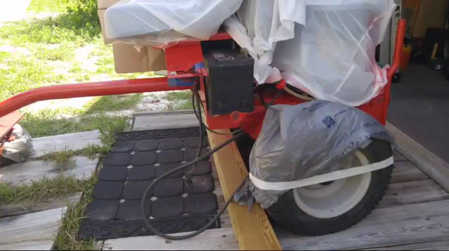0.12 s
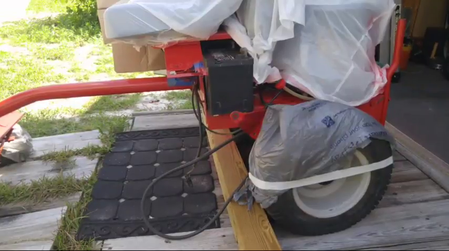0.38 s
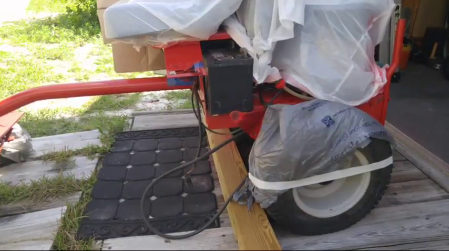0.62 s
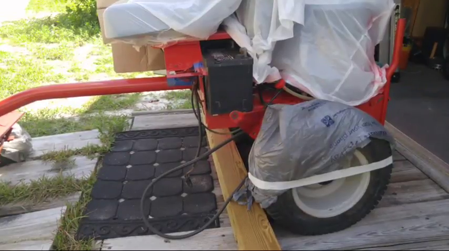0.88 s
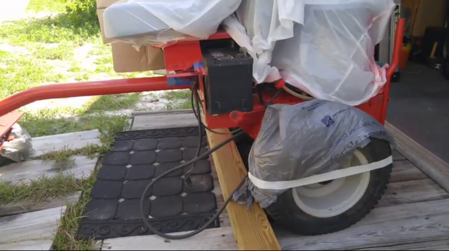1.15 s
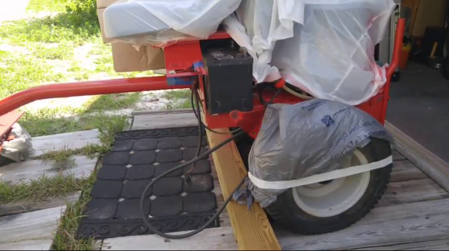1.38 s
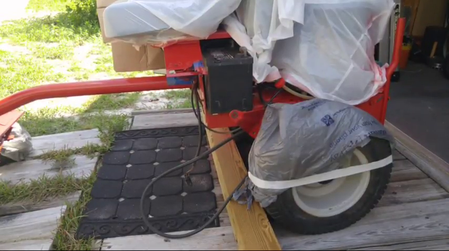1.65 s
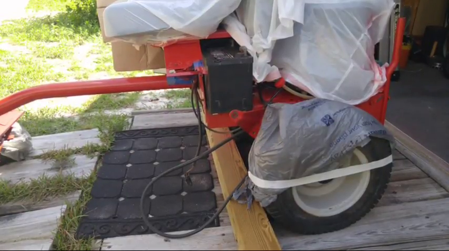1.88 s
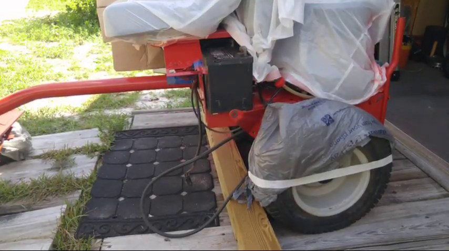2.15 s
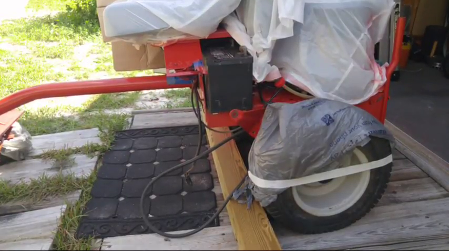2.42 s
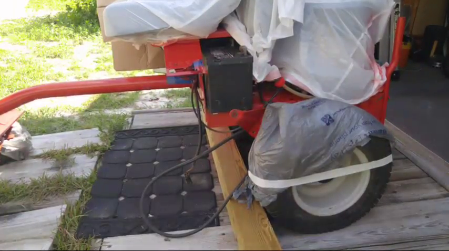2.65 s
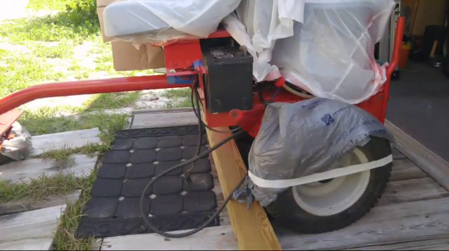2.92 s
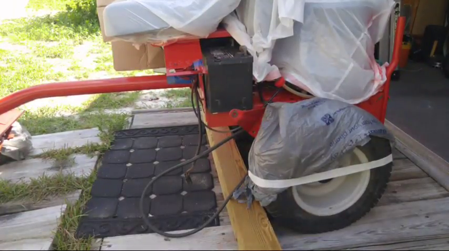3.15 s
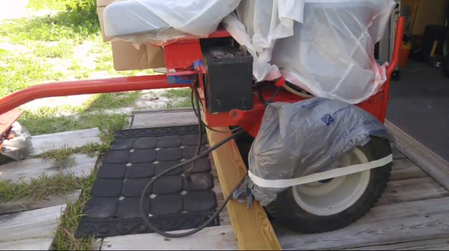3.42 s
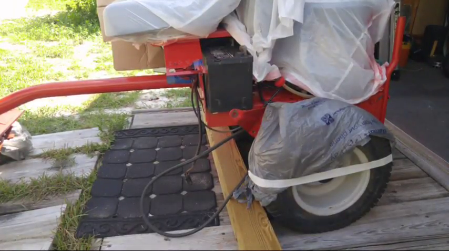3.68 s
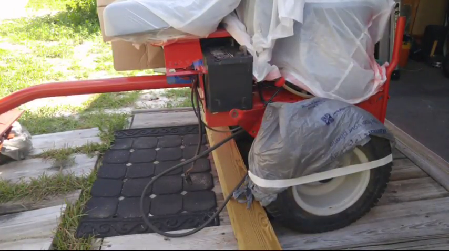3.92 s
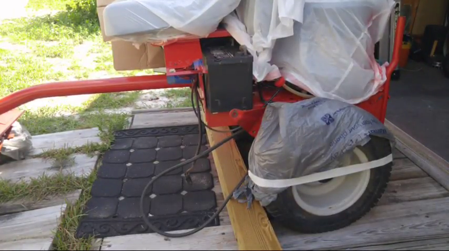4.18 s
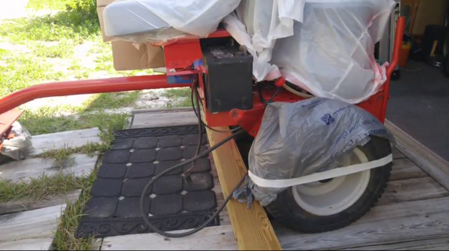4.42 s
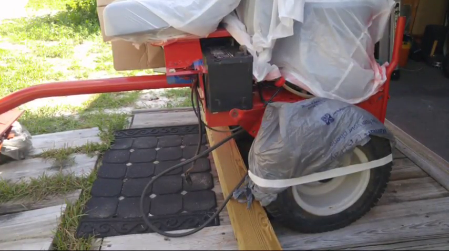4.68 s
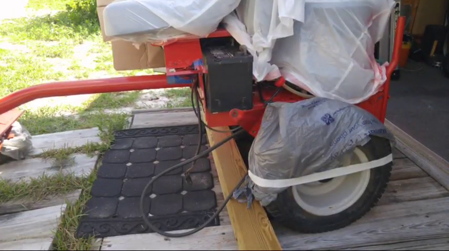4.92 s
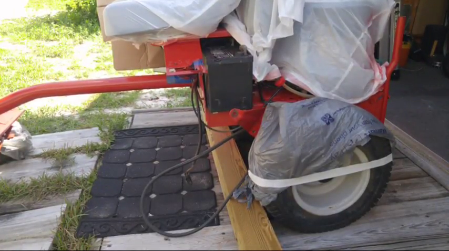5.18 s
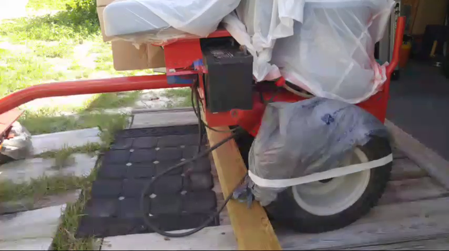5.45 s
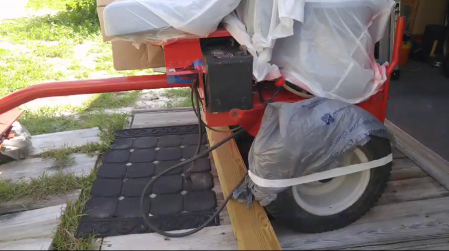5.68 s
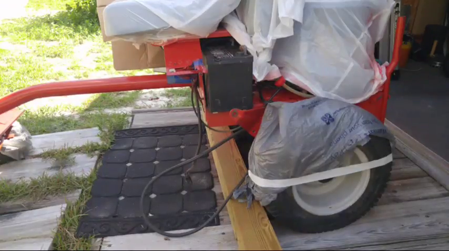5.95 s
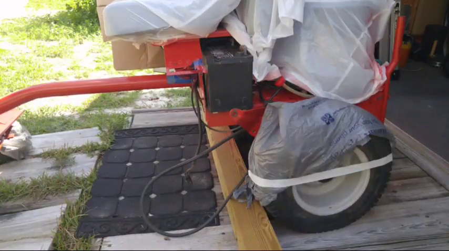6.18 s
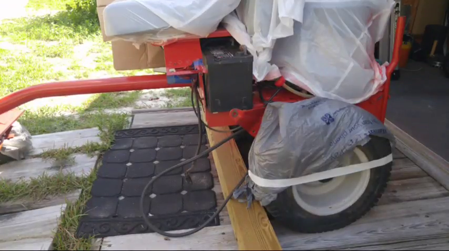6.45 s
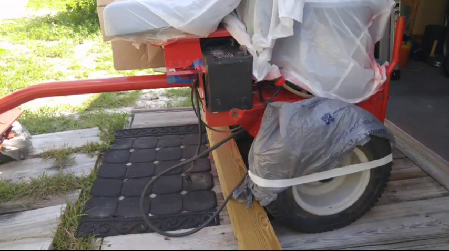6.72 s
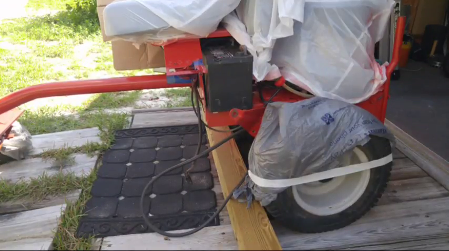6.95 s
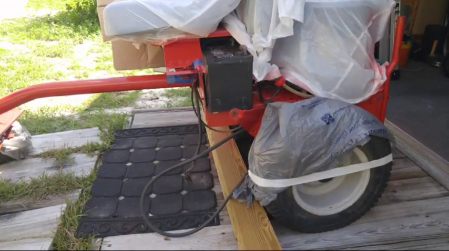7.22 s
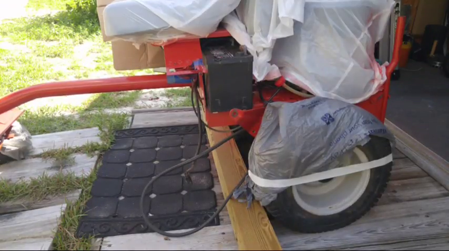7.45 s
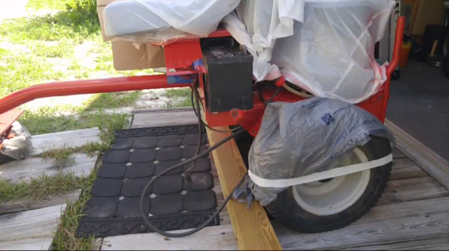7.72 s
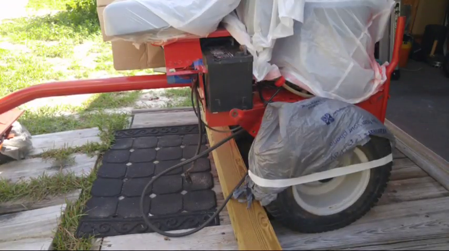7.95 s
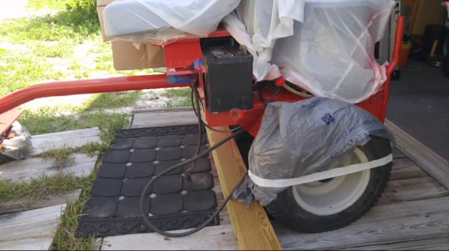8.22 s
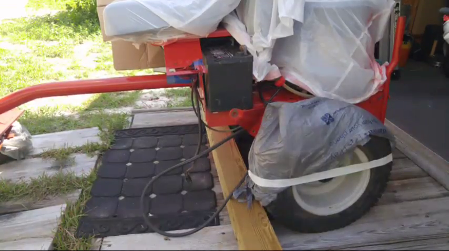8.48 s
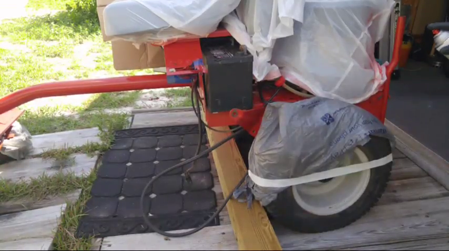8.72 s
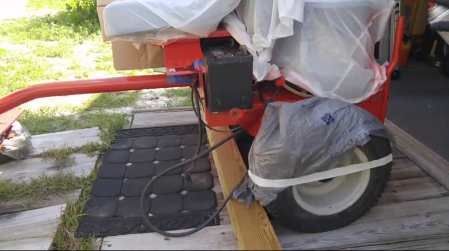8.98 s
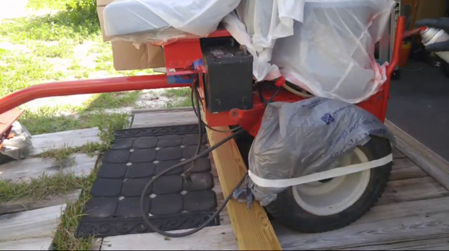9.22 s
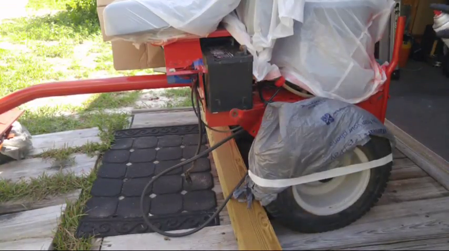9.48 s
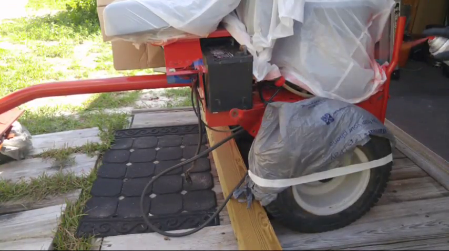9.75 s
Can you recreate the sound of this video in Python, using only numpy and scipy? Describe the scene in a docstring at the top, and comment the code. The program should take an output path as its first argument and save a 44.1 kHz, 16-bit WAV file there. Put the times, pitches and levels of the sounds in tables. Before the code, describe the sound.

Close outdoor pickup with little echo: soft air, faint wavering hum and swelling low rumble. After light dry rustling, a steel paint can is shaken, the ball knocking, bouncing and scraping round the wall, damped by liquid paint. The loudest rattling comes early, then weaker clusters. High thin bird whistles are heard three times. Finally two quick hissing spurts and a small clink.

```python
"""Shaking a spray paint can

A spray paint can is shaken in a quiet yard by an open shed: the ball knocks, bounces and rolls on the
steel wall, damped by the paint. Knocks ring decaying sines with noise cracks; rolling is noise through modes.
Two short test sprays of shaped, fluttering noise hiss near the end. A small bird whistles three times in
gliding sines, banded noise and snaps rustle close by. A hum of wavering sines lies under all, with low
rumble, two bands of noise that swell, the upper one with the shaking."""
import sys
import numpy as np
from scipy import signal
from scipy.fft import rfft, irfft
from scipy.io import wavfile

SR = 44100
rng = np.random.default_rng(int(sys.argv[2]) if len(sys.argv) > 2 else 0)


def wav_record(signal):
    """Record a signal, one row per channel, as 16-bit PCM in the file named by sys.argv[1]."""
    frames = np.transpose(np.atleast_2d(signal))
    bounded = np.clip(frames, -1, 1)
    # unit amplitude maps onto the largest positive 16-bit level
    quanta = np.round(bounded * 32767).astype(np.int16)
    wavfile.write(sys.argv[1], SR, quanta)


def amplitude_ratio(level_db):
    """Convert a level in decibels to the matching linear amplitude (field) ratio."""
    exponent = np.asarray(level_db, float) / 20
    return 10 ** exponent


N = 434826


def rms_one(x):
    """Scale to rms 1."""
    return x / np.sqrt(np.mean(x ** 2) + 1e-20)


def in_time(rows):
    """Columns of a curve at every sample; the last (a dB) falls silent outside the curve."""
    s, *columns = np.transpose(rows)
    t = np.arange(N) / SR
    out = [np.interp(t, s, c) for c in columns]
    out[-1][(t < s[0]) | (t > s[-1])] = -140
    return out


def drift(rate_hz):
    """Slow random wander with rms 1: noise through two equal low-pass poles at rate_hz."""
    r = np.exp(-80 * np.pi * rate_hz / SR)  # runs at one point per 40 samples
    noise = rng.standard_normal(N // 40 + 2002)
    slow = signal.lfilter([1], [1, -2 * r, r * r], noise)[2000:]  # skip the filter's start
    return np.interp(np.arange(N) / 40, np.arange(len(slow)), rms_one(slow))


def band(x, low_hz, high_hz):
    """Band-pass."""
    return signal.sosfilt(signal.butter(2, [low_hz, high_hz], "band", fs=SR, output="sos"), x)


def band_noise(low_hz, high_hz):
    """Steady band of noise, rms 1."""
    return rms_one(band(rng.standard_normal(N), low_hz, high_hz))


def coloured(spectrum):
    """Steady noise with the given spectrum, rms 1."""
    hz, db = np.transpose(spectrum)
    grid_hz = np.arange(1, N // 2 + 2) * SR / N
    gain = amplitude_ratio(np.interp(np.log(grid_hz), np.log(hz), db))
    return rms_one(irfft(rfft(rng.standard_normal(N)) * gain, N))


def ring(clicks, hz, t60):
    """A unit click sets a sine of height 1 ringing, down 60 dB in t60 seconds."""
    r, w = amplitude_ratio(-60 / (t60 * SR)), 2 * np.pi * hz / SR
    return signal.lfilter([0, np.sin(w)], [1, -2 * r * np.cos(w), r * r], clicks + 1e-18)


def dying(clicks, t60):
    """Envelope that jumps at each click and dies away by 60 dB in t60 seconds."""
    return signal.lfilter([1], [1, -amplitude_ratio(-60 / (t60 * SR))], clicks + 1e-18)


def train(s, sizes):
    """Clicks of the given sizes at the given times."""
    out = np.zeros(N)
    np.add.at(out, np.round(np.asarray(s) * SR).astype(int), sizes)
    return out


def held(start, length, rise, fall):
    """Gain in dB: up 60 dB in rise seconds, -30 dB at start, hold, down 60 dB in fall seconds."""
    t = np.arange(N) / SR - start
    return np.clip(60 * np.minimum(t / rise - .5, (length - t) / fall), -200, 0)


# colour of the yard air: f/Hz, relative level/dB per Hz
YARD_AIR = [(25, -12.5), (42, -13.5), (58, -8), (146, -10), (200, -2), (290, -8.5), (330, -11.5),
            (600, -14.5), (1090, -20), (1830, -25), (3000, -30.5), (4000, -29), (5000, -32), (6100, -27.5),
            (7200, -33.5), (8600, -29.5), (11300, -44.5), (17500, -45)]
# low rumble that swells and sinks, its upper part with the shaking: t/s, deep level/dB, upper level/dB
RUMBLE_SWELLS = [(0.0, -88, -85), (0.7, -95, -81), (1.9, -90, -81), (2.28, -70, -65), (2.6, -91, -78.5),
                 (3.2, -84, -74.5), (3.6, -81, -63), (4.0, -70.5, -63), (4.25, -82, -69.5), (4.7, -78, -74),
                 (5.0, -69, -73.5), (5.35, -76, -78), (5.8, -83, -76), (6.2, -75, -72.5), (6.5, -83, -80),
                 (7.35, -90, -80), (7.7, -75, -84.5), (8.35, -81.5, -74), (9.0, -71, -75), (9.86, -82, -74)]
# hum lines, before their waver: f/Hz, rms level/dB
HUM_LINES = [(119, -79.5), (290, -78.5), (587, -85), (684, -89.5), (1055, -89), (1114, -92.5)]


def yard():
    """Steady shaped noise for air, two swelling noise bands for rumble and wavering sines for hum."""
    t = np.arange(N) / SR
    hum = 0
    for hz, db in HUM_LINES:
        line = np.sin(2 * np.pi * (hz * t + .15 * drift(2.2)))
        hum = hum + np.sqrt(2) * amplitude_ratio(db + 1.7 * drift(3)) * line
    deep_db, upper_db = in_time(RUMBLE_SWELLS)
    deep = band_noise(58, 82) * amplitude_ratio(deep_db)
    upper = band_noise(110, 290) * amplitude_ratio(upper_db)
    return amplitude_ratio(-69.5) * coloured(YARD_AIR) + deep + upper + hum


# swells of the rustle's hiss, before its flutter: t/s, level/dB
RUSTLE_SWELLS = [(0.4, -82), (0.5, -91), (0.536, -77), (0.636, -69.5), (0.716, -76), (0.826, -100),
                 (1.03, -80), (1.126, -89), (1.262, -80), (1.43, -83.5), (1.66, -71.5), (1.84, -82),
                 (1.998, -69), (2.03, -76), (2.7, -92), (3.05, -80), (3.28, -78)]
# dry snaps: t/s, peak level/dB, f/Hz
RUSTLE_SNAPS = [(0.702, -47, 4800), (0.701, -48, 8200), (0.9394, -65, 4020), (1.035, -53, 4400),
                (1.269, -51, 6900), (1.621, -50, 3480)]


def rustle():
    """Cloth or thin plastic close by: grainy hiss and a few dry snaps, each a very short ringing sine."""
    hiss = band_noise(3000, 9300) * amplitude_ratio(in_time(RUSTLE_SWELLS)[0] + 2.2 * drift(60))
    return hiss + sum(ring(train([s], amplitude_ratio(db)), hz, 0.0027) for s, db, hz in RUSTLE_SNAPS)


# whistles: t/s, length/s, first f/Hz, last f/Hz, drop into pitch f/Hz, level/dB before flutter
WHISTLES = [(1.065, .22, 6930, 6780, 600, -72), (2.9, .25, 6680, 6280, 60, -73),
            (6.855, .22, 7000, 6910, 550, -77)]


def bird():
    """A thin wavering whistle that drops into its gliding pitch, with a weaker fluttering partner below."""
    chirp_s, rise_s, fall_s = .025, .03, .3  # rise and fall are times for 60 dB
    out = 0
    for s, length, first_hz, last_hz, chirp_hz, db in WHISTLES:
        t = np.clip(np.arange(N) / SR - s, 0, length)
        hz = first_hz + (last_hz - first_hz) * t / length + chirp_hz * np.exp(-t / chirp_s)
        phase = 2 * np.pi * np.cumsum(hz + 25 * drift(88)) / SR
        whistle = np.sin(phase) * amplitude_ratio(3.5 * drift(30))
        partner = amplitude_ratio(-17) * np.sin(.85 * phase) * (1 + .6 * drift(40))
        out = out + np.sqrt(2) * amplitude_ratio(db + held(s, length, rise_s, fall_s)) * (whistle + partner)
    return out


# the ball rolls round the wall: t/s, length/s, wall ring level/dB, scrape level/dB
ROLLS_ROUND = [(1.95, .09, -73, -70), (2.047, 0.34, -72.5, -66.5), (2.463, 0.15, -72.5, -69),
               (3.352, 0.19, -68, -66), (3.565, 0.34, -61.5, -60), (3.932, 0.24, -67, -69.5),
               (4.183, .04, -75, -72), (4.315, 0.11, -59, -68), (4.518, .13, -69, -68),
               (4.66, .17, -70, -73), (4.842, 0.11, -84, -71.5), (4.987, 0.23, -80, -84.5),
               (5.417, 0.15, -81.5, -88), (5.75, 0.24, -76, -87), (5.96, .1, -63, -64.5),
               (6.116, 0.054, -69, -65.5), (6.191, 0.11, -63, -65), (6.308, 0.14, -69, -76),
               (6.446, 0.095, -67, -66.5), (6.565, .14, -87, -76.5), (6.726, 0.073, -66, -66.5),
               (6.821, 0.28, -79, -76.5), (7.283, .19, -73, -77.5), (7.629, .14, -72, -79),
               (7.896, .15, -78.5, -80.5), (8.1, 0.19, -86, -82), (8.31, .26, -79.5, -79.5)]
ROLL_HZ, SLOSH_HZ = 1710, 70  # middle of the wall ring's pitch, and its spread as the paint sloshes


def roll_levels():
    """Wall and scrape level of the rolling ball, dB at every sample, overlapping rolls adding up."""
    gains = 0
    for s, length, wall_db, scrape_db in ROLLS_ROUND:
        gains = gains + amplitude_ratio(held(s, length, 0.033, 0.11) + np.c_[[wall_db, scrape_db]])
    return 20 * np.log10(gains)


# modes of the can above the wall ring, lowest parts first: f/Hz, relative level/dB, nominal t60/s
CAN_MODES = [(2254, -19.5, 0.03), (2630, -12.5, .05), (2930, -17, 0.088), (3120, -11.5, 0.021),
             (3614, -10, 0.067), (3890, -5.5, 0.025), (4300, -12, .07), (4480, -10, .05),
             (4630, -16, 0.046), (5070, -18, 0.07), (5486, -12.5, 0.023), (5770, -25, .07),
             (6100, -5.5, 0.033), (6490, -6, 0.036), (6690, -14, 0.054), (7000, -15.5, .05),
             (7150, -21.5, 0.036), (7930, -12, 0.036), (8420, -11, 0.066), (8750, 1.5, 0.018),
             (8710, -5, 0.029), (9200, -3, .035), (9520, 0.5, 0.016), (10200, -8, 0.028)]
# colour of the ball's scrape: f/Hz, relative level/dB per Hz
SCRAPE_COLOUR = [(1500, -26), (2300, -4), (2800, -2.5), (4400, -0.5), (5400, -3.5), (6400, 0.5), (7400, -1),
                 (8800, 0.5), (10000, -5), (11500, -22), (15000, -30)]


def rolling(wall_db, scrape_db):
    """Dense uneven skips drive the wall ring and, as a scrape, the body and shoulder modes."""
    hz = ROLL_HZ + SLOSH_HZ * drift(4.0)
    # about 250 skips a second
    skips = (rng.random(N) < 250 / SR) * amplitude_ratio(3.0 * np.minimum(rng.exponential(1, N), 3))
    bumpy = 1.2 + rms_one(dying(skips, .03))
    # a narrow band of noise carried along the moving pitch
    r = np.exp(-np.pi * 100 / SR)
    noise = rng.standard_normal(N) + 1j * rng.standard_normal(N)
    slow = signal.lfilter([1], [1, -r], bumpy * noise)
    wall = rms_one(np.real(slow * np.exp(2j * np.pi * np.cumsum(hz) / SR)))
    rub = bumpy * coloured(SCRAPE_COLOUR)
    rings = 0
    for k, (mode_hz, db, t60) in enumerate(CAN_MODES[:17]):  # those below the rim
        rings = rings + amplitude_ratio(db) * ring(rub, mode_hz, .6 * t60) * (-1) ** k
    scrape = rms_one(0.7 * rms_one(rings) + rms_one(rub))
    return amplitude_ratio(wall_db) * wall + amplitude_ratio(scrape_db) * scrape


# ball on steel, drive into each part: t/s, wall ring f/Hz, wall ring level/dB, body level/dB, rim level/dB
BALL_KNOCKS = [(2.04, 1640, -55, -35, -28), (2.0748, 1770, -42, -43, -47), (2.1037, 2110, -52, -35, -27),
               (2.1827, 1673, -42, -39.5, -39), (2.2236, 1730, -43.5, -45, -42),
               (2.2461, 1980, -43, -35.5, -27), (2.2565, 1680, -44, -41, -43),
               (2.2868, 1710, -41, -43, -48), (2.3255, 1610, -51, -47, -55), (2.3492, 1570, -52, -57, -52),
               (2.453, 1750, -50.5, -45, -37.5), (2.4871, 1730, -50, -49, -52),
               (2.51, 1730, -51, -50.5, -55), (2.528, 1710, -65, -58, -66), (2.5513, 1760, -63, -52.5, -45),
               (2.5736, 1780, -71, -61, -64), (3.2989, 1970, -53, -47, -48.5),
               (3.351, 1485, -39, -32.5, -34), (3.3831, 1720, -59, -51, -38.5),
               (3.4651, 1530, -43.5, -44, -40.5), (3.4693, 1760, -39.5, -28, -25),
               (3.5405, 1730, -71, -59, -51), (3.5615, 1480, -31, -26.5, -28),
               (3.5643, 1455, -49, -22, -45), (3.5824, 1460, -62, -40.5, -42),
               (3.5965, 1600, -38, -28, -30), (3.6111, 1530, -36, -33.5, -38),
               (3.6397, 1580, -37, -40.5, -42), (3.6799, 1930, -43, -30.5, -25.5),
               (3.7156, 1910, -44.5, -41, -43), (3.7572, 2270, -54, -15, -29.5),
               (3.7656, 1555, -36.5, -42, -27), (3.8027, 1645, -31, -35, -34.5),
               (3.8224, 1630, -50, -35, -37), (3.8421, 1620, -41.5, -47, -43), (3.89, 1560, -42, -29, -25),
               (3.928, 1713, -38, -41, -45), (3.9559, 1730, -38, -46, -45.5),
               (4.0236, 1706, -39, -43, -38.5), (4.0385, 1610, -52, -27.5, -29.5),
               (4.0535, 1736, -47, -47, -58), (4.1296, 1735, -54, -63, -62), (4.195, 1540, -57, -68, -67),
               (4.2882, 1700, -38.5, -35, -35.5), (4.3157, 1680, -53, -59.5, -64),
               (4.3345, 1676, -37, -39, -40.5), (4.381, 1640, -51.5, -51.5, -46.5),
               (4.4148, 1800, -49.5, -54.5, -54.5), (4.4998, 1690, -47, -55, -58),
               (4.5094, 1555, -54, -57, -51), (4.515, 1590, -49.5, -51.5, -54.5),
               (4.579, 1730, -56, -58, -61), (4.6298, 2170, -57, -47.5, -41.5),
               (4.8336, 1757, -51.5, -39.5, -35.5), (4.9726, 2044, -40.5, -48, -46),
               (5.0384, 1980, -54, -61.5, -58), (5.052, 2100, -62, -47.5, -44),
               (5.1186, 1630, -56, -59, -68), (5.1617, 1620, -57, -64, -72),
               (5.1804, 1650, -59.5, -73, -71.5), (5.7033, 1830, -51.5, -51.5, -36.5),
               (5.7097, 1826, -40.5, -39, -53.5), (5.7255, 1740, -57, -74, -48.5),
               (5.7494, 1850, -58, -59, -52), (5.791, 1810, -57, -58, -58), (5.8309, 1675, -45.5, -53, -58),
               (5.884, 1410, -61, -56.5, -60.5), (5.9286, 1760, -43, -46, -47),
               (5.9406, 1670, -41, -55, -50.5), (5.9524, 1580, -51, -55, -59),
               (5.9668, 1780, -44.5, -39, -31.5), (5.9814, 1580, -70, -55, -58),
               (5.9939, 1700, -57, -48.5, -55), (6.0251, 1790, -56, -55.5, -55),
               (6.0383, 1665, -58, -56, -62), (6.0463, 1660, -50, -58, -56),
               (6.1208, 1616, -58, -68.5, -61), (6.1286, 1410, -54, -61.5, -62),
               (6.1878, 1990, -47, -38, -36), (6.2072, 1625, -50, -48.5, -43),
               (6.222, 1670, -48.5, -51, -50), (6.2343, 1636, -47, -53, -54), (6.247, 1652, -44, -56, -57),
               (6.3113, 1410, -63, -61, -64), (6.4485, 1660, -52.5, -43.5, -43.5),
               (6.4671, 1690, -54, -55, -52), (6.4839, 1650, -50.5, -54, -62),
               (6.6007, 1570, -60.5, -50.5, -45), (6.7128, 1580, -42.5, -45, -41.5),
               (6.725, 1860, -47, -62.5, -53), (6.7476, 1380, -52, -65.5, -54),
               (6.7669, 1578, -41, -40, -38), (6.8922, 1790, -44, -46, -49.5),
               (6.9499, 1830, -46.5, -50.5, -49.5), (7.0013, 1647, -51.5, -56.5, -60.5),
               (7.0349, 1700, -55, -66.5, -76), (7.1763, 1746, -54.5, -43, -44.5),
               (7.2687, 1780, -57.5, -64, -67), (7.2974, 1770, -58, -64.5, -65.5),
               (7.3237, 1730, -62, -63.5, -67), (7.3398, 1710, -62, -65, -67),
               (7.4114, 1560, -65.5, -55, -55.5), (7.4307, 1880, -70.5, -67, -65.5),
               (7.449, 1848, -73, -65, -69), (7.8793, 1780, -55, -42.5, -46),
               (7.9299, 1996, -59.5, -58, -61.5), (7.9662, 1800, -63, -60.5, -57.5),
               (8.307, 1740, -52.5, -40.5, -41), (8.3424, 1780, -47.5, -51, -53),
               (8.4017, 1760, -61, -65.5, -64), (8.4234, 1730, -58, -69.5, -66),
               (8.5015, 1800, -65, -55.5, -56.5), (8.5415, 1810, -65, -64, -65.5),
               (8.436, 1720, -62, -71, -75), (8.569, 1850, -65, -69, -68),
               (8.5858, 1830, -70.5, -70.5, -68.5), (9.7901, 1838, -53.5, -43, -42.5),
               (9.8027, 1860, -57, -55, -52), (9.841, 1820, -59, -60, -58)]


def blows(wall_db, scrape_db):
    """The listed knocks, then light skips at random while the ball rolls; rows as knocks() needs them."""
    skip_db, spread_db = 2.5, 3.0  # skips stand this far above the roll
    luck = rng.standard_normal((170, 4))
    i = rng.integers(0, N, size=len(luck))
    levels = np.c_[wall_db[i], scrape_db[i], scrape_db[i]] + skip_db + spread_db * luck[:, 1:]
    skips = np.c_[i / SR, ROLL_HZ + SLOSH_HZ * luck[:, 0], levels]
    audible = skips[wall_db[i] > -88]  # only those that fall within a roll
    s, wall_hz, wall, body, rim = np.vstack([BALL_KNOCKS, audible]).T
    shoulder = body + 0.63 * (rim - body) - 1  # lies between body and rim
    return s, wall_hz, wall, body, shoulder, rim


# bounds of body, shoulder and rim: f/Hz
PART_EDGES = [2250, 5300, 7200, 11000]
# decay of the crack of contact in body, shoulder, rim: t60/s
CRACK_T60 = [.007, .005, .005]
# decay of the dense crowd of modes in body, shoulder, rim: t60/s
DENSE_T60 = [.05, 0.05, 0.022]
# low modes of the can: f/Hz, relative level/dB, t60/s
LOW_MODES = [(503, -25.5, 0.032), (759, -27.5, 0.087), (858, -24.5, 0.045), (1124, -23, 0.04),
             (1310, -18.5, 0.025)]


def knocks(s, wall_hz, wall_db, *parts_db):
    """Each knock strikes the modes unevenly, cracks briefly and leaves a wash from the shed."""
    wall_t60, shed_t60 = 0.031, 0.16  # seconds
    hz, level_db, t60 = np.transpose(CAN_MODES)[:, :, None]
    part = np.searchsorted(PART_EDGES, hz[:, 0]) - 1
    part_power = np.bincount(part, amplitude_ratio(2 * level_db[:, 0]))
    luck = rng.standard_normal((len(s), 4, len(CAN_MODES), 1))
    t = np.arange(round(.11 * SR)) / SR
    taper = 1 - t / t[-1]
    # most of a ring is soaked up by the paint at once, a weak part lasts
    fade = amplitude_ratio(-60 * t / (.6 * t60)) + 0.49 * amplitude_ratio(-60 * t / (1.45 * t60))
    fade = fade * (1 - np.exp(-t / 0.00023)) * taper
    swell = amplitude_ratio(-60 * t / wall_t60) + .18 * amplitude_ratio(-60 * t / 0.075)
    swell = swell * (1 - np.exp(-t / 0.00068)) * taper
    out = np.zeros(N)
    for k, (strength, shift, split, phase) in enumerate(luck):
        # paint and grip shift every mode a little from blow to blow and split it into a beating pair
        turns = 2 * np.pi * hz * (1 + .018 * shift) * t
        beats = 1 + .6 * np.cos(2 * np.pi * 90 * split * t + 3 * phase)
        share = amplitude_ratio(level_db + 5.0 * strength)[:, 0]
        # the blow's energy in each part is given; chance only deals it out among the modes
        share *= np.sqrt(part_power / np.bincount(part, share ** 2))[part]
        size = (amplitude_ratio(np.array(parts_db)[part, k]) * share)[:, None]
        modes = np.sum(size * fade * beats * np.sin(turns), axis=0)
        # the wall ring is a rough cluster that moves widely in pitch as the paint sloshes
        w = 2 * np.pi * wall_hz[k] * t
        above = 0.44 * np.sin(w * (1.06 + 0.042 * split[0]) + 3 * phase[0])
        below = .5 * np.sin(w * (.92 + 0.036 * split[1]) + 3 * phase[1])
        wall = amplitude_ratio(wall_db[k] + 4.0) * swell * (np.sin(w) + above + below)
        i = round(s[k] * SR)
        out[i:i + len(t)] += (modes + wall)[:N - i]
    # crack of contact, a crowd of modes too dense to tell apart, and the shed's wash
    for low, high, db, crack, dense in zip(PART_EDGES, PART_EDGES[1:], parts_db, CRACK_T60, DENSE_T60):
        hits = train(s, amplitude_ratio(db))
        envelope = amplitude_ratio(-1.0) * dying(hits, crack) + amplitude_ratio(-12) * dying(hits, dense)
        out += band_noise(low, high) * (envelope + amplitude_ratio(-31.5) * dying(hits, shed_t60))
    # the low modes answer wall and body blows alike
    blow_db = .5 * (wall_db + parts_db[0])
    for k, (low_hz, db, ring_s) in enumerate(LOW_MODES):
        thuds = train(s, amplitude_ratio(blow_db + db + 8.5) * luck[:, 3, k + 1, 0])
        out += ring(thuds, low_hz, ring_s)
    wash = dying(train(s, amplitude_ratio(wall_db)), shed_t60) * band_noise(1300, 2200)
    return out + amplitude_ratio(-18.5) * wash


def crackle(s, rim_db):
    """The very top of each rim blow, a short spit of noise above the rings."""
    return dying(train(s, amplitude_ratio(rim_db)), 0.023) * band_noise(11000, 21000)


# nozzle open, level before the dribble adds to it: t/s, length/s, first level/dB, last level/dB
NOZZLE = [(9.092, .196, -55, -53), (9.607, .18, -58.5, -58)]
# colour of the jet: f/Hz, relative level/dB per Hz
JET_COLOUR = [(530, -52), (900, -24), (1320, -30), (1630, -20.5), (2820, -21.5), (3120, -13.5),
              (3800, -6.5), (4810, -2.5), (5450, -9), (6170, -4), (6980, -3.5), (8730, 0), (10400, -13),
              (13300, -24), (16400, -21.5), (17500, -26.5)]


def sprays():
    """A bright jet of gas and paint; four bands of its noise flutter partly on their own."""
    open_s, shut_s, dribble_s, dribble_db = .015, .04, .3, -17  # times for 60 dB
    source, together = coloured(JET_COLOUR), drift(25)
    jet = 0
    for low, high in [(700, 4000), (4000, 7200), (7200, 11000), (11000, 17800)]:
        flutter_db = 0.61 * together + 1.3 * drift(39.2) + .6 * drift(6.0)
        jet = jet + band(source, low, high) * amplitude_ratio(flutter_db)
    flow = 0
    for s, length, first_db, last_db in NOZZLE:
        level = amplitude_ratio(np.interp(np.arange(N) / SR, [s, s + length], [first_db, last_db]))
        burst = amplitude_ratio(held(s, length, open_s, shut_s))
        dribble = amplitude_ratio(dribble_db + held(s, length, open_s, dribble_s))
        flow = flow + level * (burst + dribble)
    return rms_one(jet) * flow


def scene():
    """All sources, one microphone; each knock is band-limited, cut below 330 Hz and above 10.3 kHz."""
    roll_db = roll_levels()
    hits = blows(*roll_db)
    limits = signal.butter(4, [330, 10300], "band", fs=SR, output="sos")
    can = signal.sosfilt(limits, knocks(*hits)) + amplitude_ratio(-21.5) * crackle(hits[0], hits[-1])
    mix = yard() + rustle() + bird() + rolling(*roll_db) + can + sprays()
    return mix[None]


def band_limit(x):
    """A steep low-pass at the top of the band."""
    return signal.sosfilt(signal.butter(12, 18300, fs=SR, output="sos"), x)


def record(dry):
    """The microphone cuts the deep bass below 55 Hz and ends near 17 kHz."""
    x = signal.sosfilt(signal.butter(4, 55, "high", fs=SR, output="sos"), dry)
    x = signal.sosfilt(signal.cheby2(10, 35, 17300, fs=SR, output="sos"), x)
    return band_limit(x)


dry = scene()
out = record(dry)
wav_record(out)
```